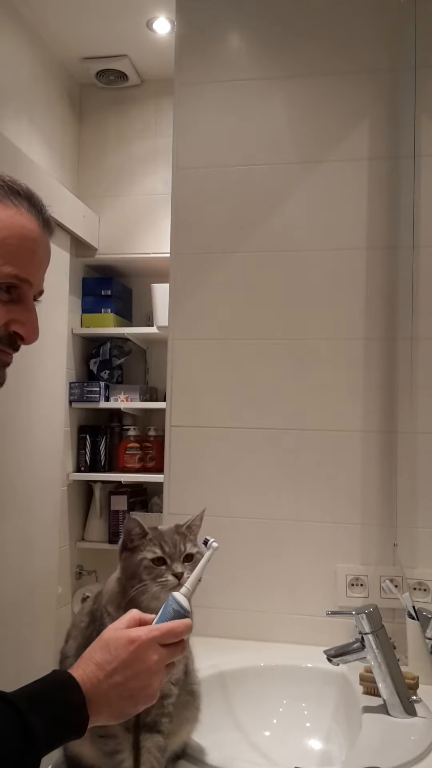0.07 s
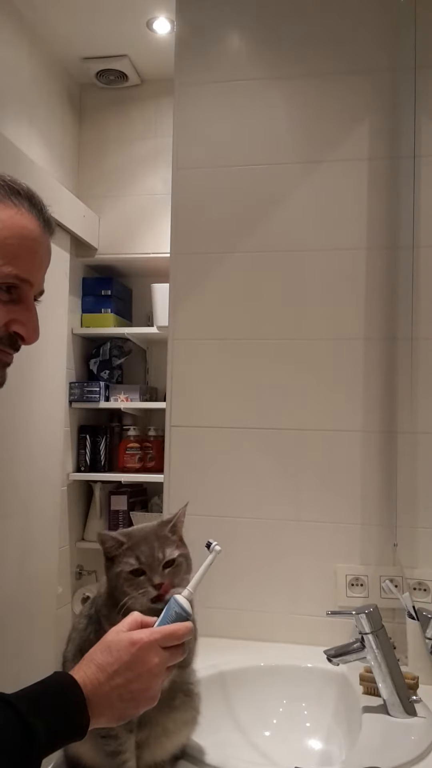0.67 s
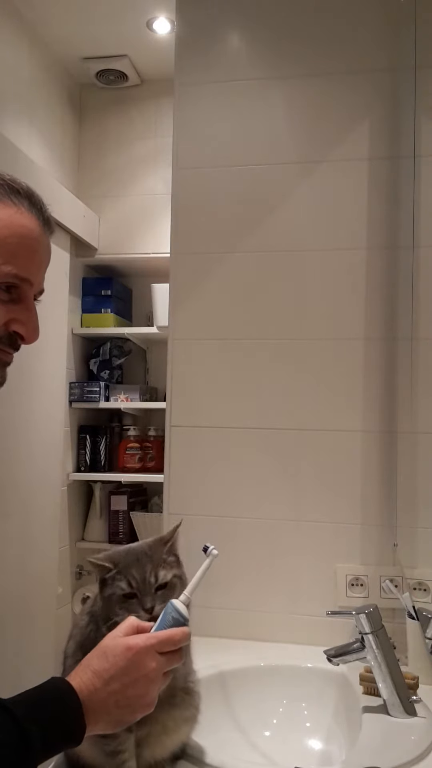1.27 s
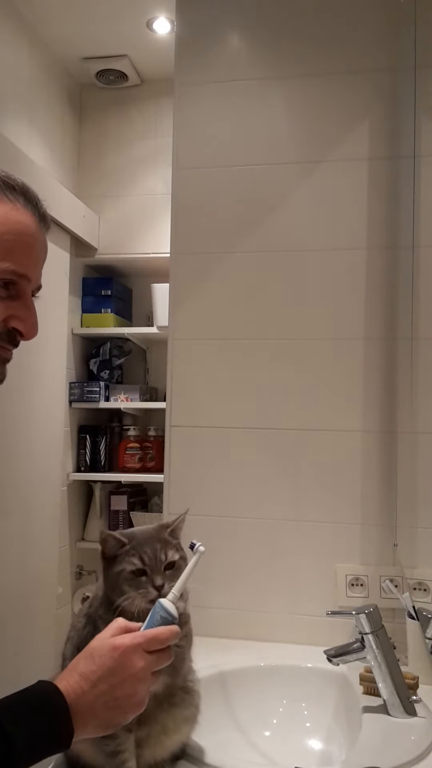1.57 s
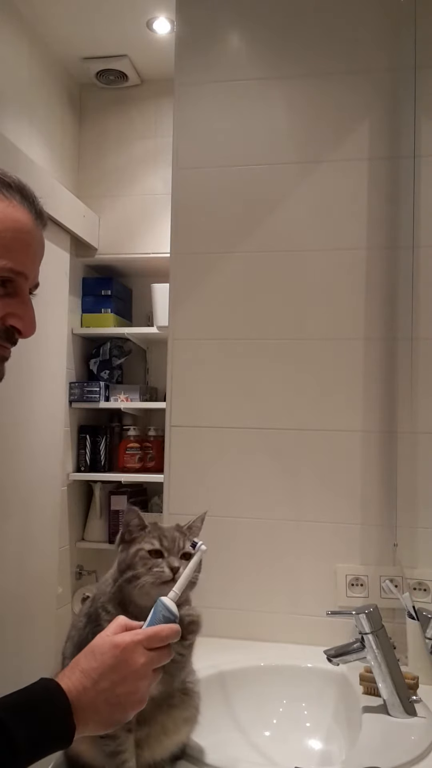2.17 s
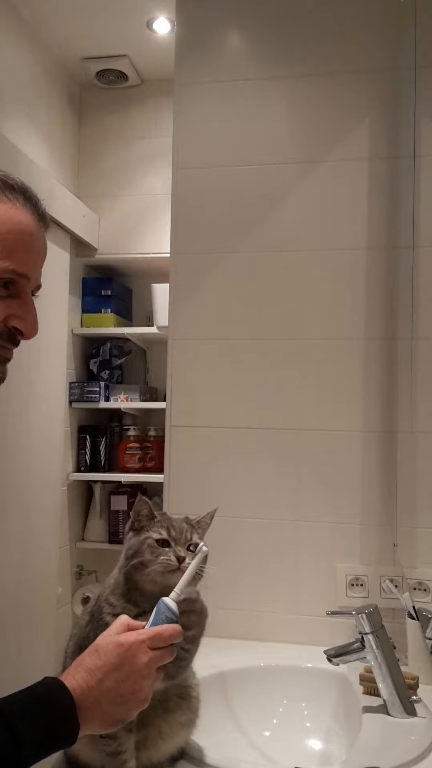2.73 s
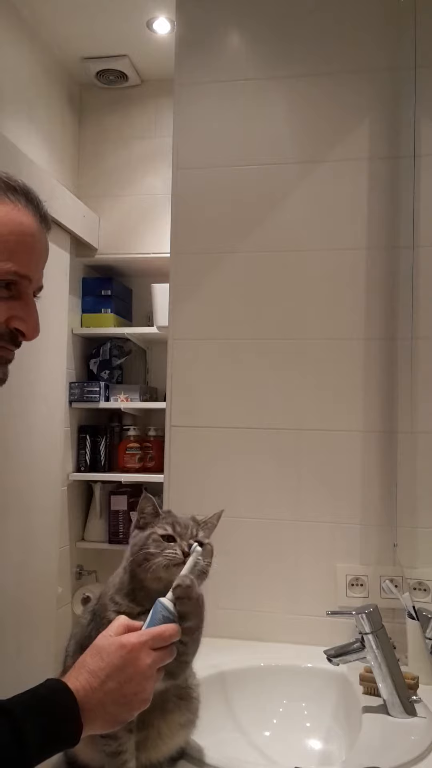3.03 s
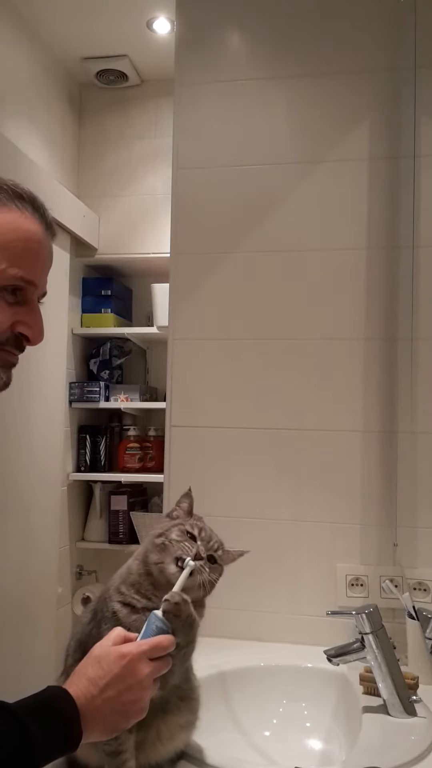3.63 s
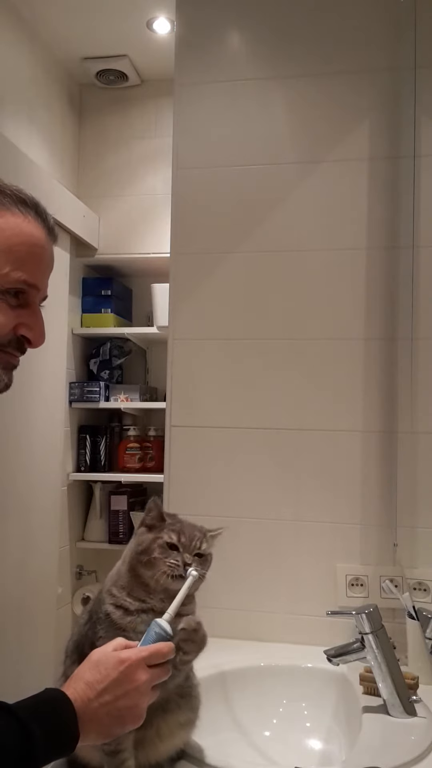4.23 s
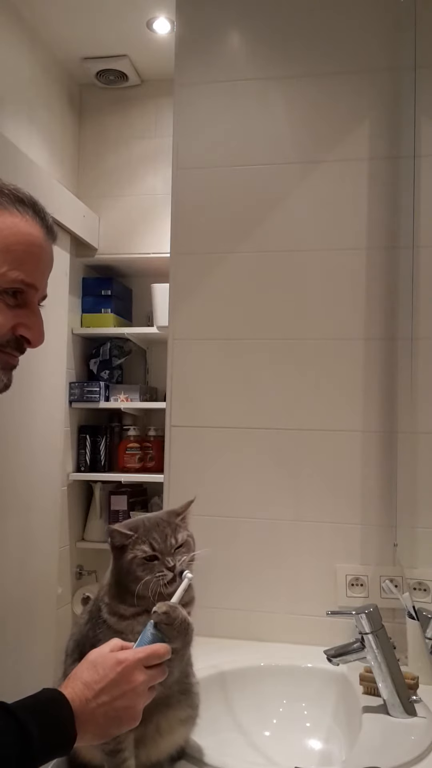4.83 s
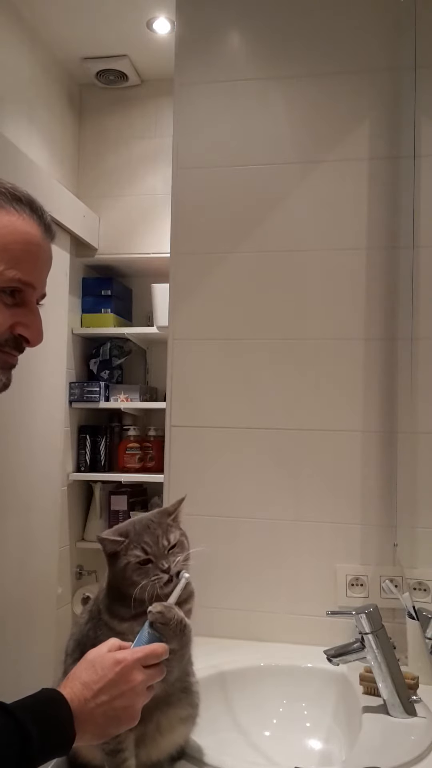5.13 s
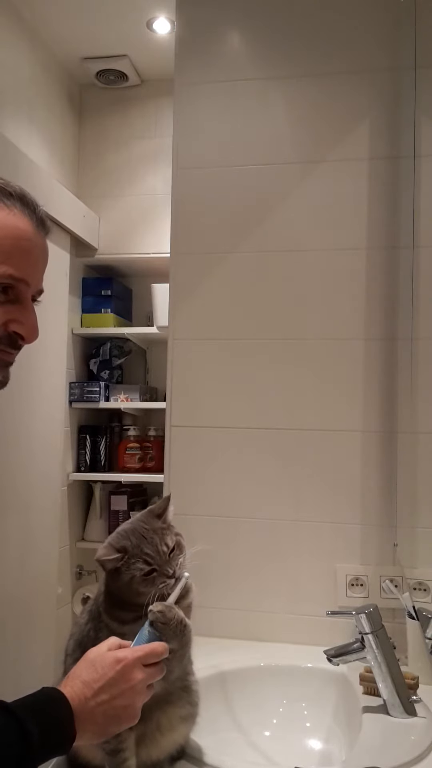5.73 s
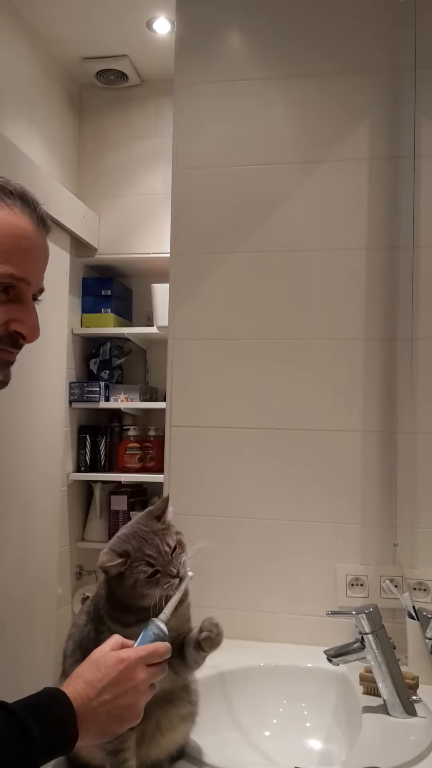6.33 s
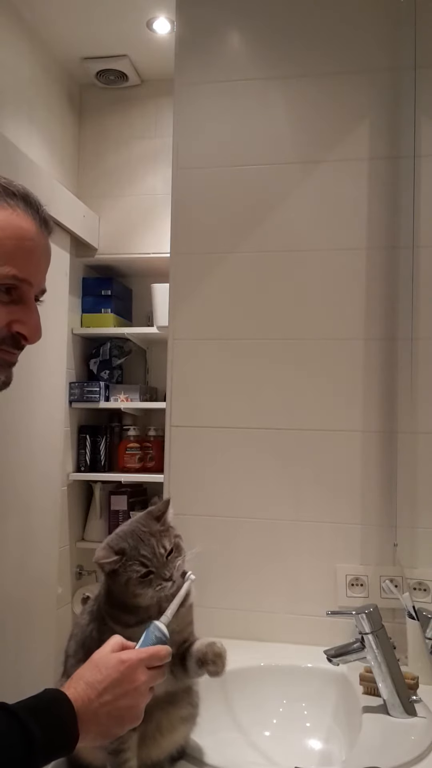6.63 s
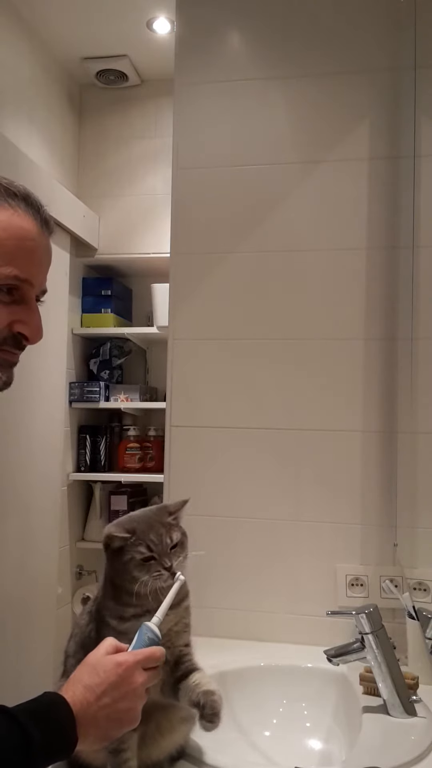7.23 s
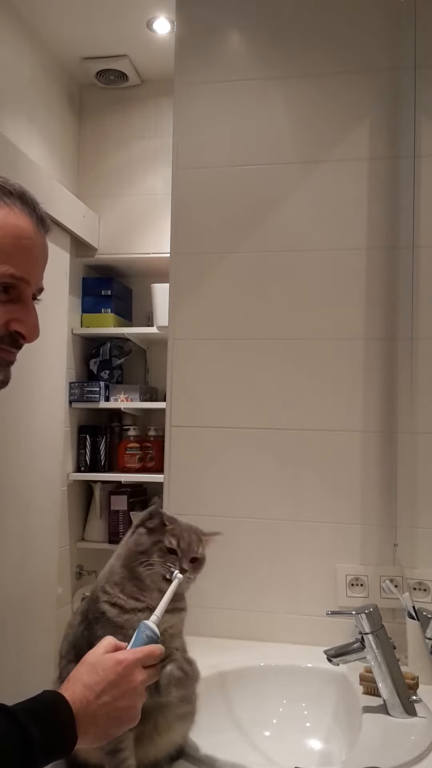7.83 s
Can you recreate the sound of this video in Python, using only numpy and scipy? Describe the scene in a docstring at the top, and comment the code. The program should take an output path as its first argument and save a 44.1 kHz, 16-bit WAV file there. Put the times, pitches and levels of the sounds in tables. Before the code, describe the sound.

After a faint ventilation hum, an electric toothbrush starts buzzing, rasps lightly on a cat's whiskers, and stutters four times before running on.

```python
"""An electric toothbrush runs in a small tiled bathroom while a cat rubs its face on the bristles.
One shaft drives the motor's whine, the gear's buzz, the handle's rattle and the head's sizzle; near the
end the power cuts out four times. A thumb rubs the switch first; the bristles snap on whiskers and hiss
through fur, and the head's scrapes ring the housing. Behind, a ventilator drones over a soft rumble,
held down by a noise suppressor until the brush starts."""
import sys
import numpy as np
from scipy import signal
from scipy.fft import rfft, irfft, next_fast_len
from scipy.io import wavfile
from scipy.ndimage import uniform_filter1d

SR = 44100
rng = np.random.default_rng(int(sys.argv[2]) if len(sys.argv) > 2 else 0)


def put_to_file(sound):
    """Save the sound as 16-bit audio at rate SR, in the file named by the first command-line argument."""
    columns = np.atleast_2d(sound).T  # one column per channel
    safe = np.clip(columns, -1, 1)
    whole_steps = np.round(safe * 32767)
    wavfile.write(sys.argv[1], SR, whole_steps.astype(np.int16))


N = 357210
TIME = np.arange(N) / SR


def from_db(db):
    """Decibels to gain."""
    return 10 ** (np.asarray(db) / 20)


def unit_mid(x):
    """Scale a stereo pair to a mid rms of 1."""
    return x / np.sqrt(np.mean(x.mean(0) ** 2) + 1e-20)


def in_time(rows):
    """A table's value columns, interpolated at every sample."""
    times_s, *columns = np.transpose(rows)
    return [np.interp(TIME, times_s, column) for column in columns]


def at_hz(rows, hz):
    """Read a table on a log-frequency axis."""
    points_hz, values = np.transpose(rows)
    return np.interp(np.log(hz + 1e-3), np.log(points_hz), values)


def filtered(x, gain_at):
    """Zero-phase filter; gain_at maps Hz to gain."""
    size = next_fast_len(N + 4096)
    hz = np.arange(size // 2 + 1) * SR / size
    return irfft(rfft(x, size) * gain_at(hz), size)[..., :N]


def drift(rate_hz, hop=64):
    """Slow noise with a standard deviation of 1."""
    white = rng.standard_normal(next_fast_len(N // hop + 1024))
    hz = np.arange(len(white) // 2 + 1) * SR / hop / len(white)
    slow = irfft(rfft(white) / (1 + (hz / rate_hz) ** 4))
    return np.interp(np.arange(N) / hop, np.arange(len(slow)), slow / slow.std())


def swell(centre_s, half_s):
    """Gaussian envelope, 1/e at half_s from its centre."""
    return np.exp(-((TIME - centre_s) / half_s) ** 2)


def lagged(x, tau_s):
    """One-pole smoothing."""
    pole = np.exp(-1 / (tau_s * SR))
    return signal.lfilter([1 - pole], [1, -pole], x)


def bathroom(x, wet_db, early_db=-3, echoes=12, t60_s=0.3):
    """Direct sound, right side first, echoes off basin and walls, and a diffuse tail from the tiles."""
    direct = np.array([np.roll(x, 4), x])
    lags = (rng.uniform(.001, .022, (2, echoes)) * SR).astype(int)
    early = np.array([sum(np.roll(x, lag) for lag in side) for side in lags]) / np.sqrt(echoes)
    pole = from_db(-120 / (t60_s * SR))
    energy = signal.lfilter([1 - pole], [1, -pole], x ** 2 + 1e-18)
    tail = np.sqrt(energy) * rng.standard_normal((2, N))
    return unit_mid(direct + from_db(early_db) * early + from_db(wet_db) * tail)


# Diffuse field. Each row: frequency in Hz, left-right correlation.
COHERENCE = [(60, 0.76), (200, 0.92), (400, 0.71), (800, 0.3), (2000, 0.033), (10000, 0.065)]

def diffuse(gain_at):
    """Stereo noise, alike on both sides in the bass, unrelated in the treble."""
    def gains(hz):
        alike = at_hz(COHERENCE, hz)
        return gain_at(hz) * np.sqrt([1 + alike, 1 - alike])
    mid, side = filtered(rng.standard_normal((2, N)), gains)
    return unit_mid(np.array([mid + side, mid - side]))


def resonant(centre_hz, half_width_hz):
    """Noise ringing in one resonance."""
    return diffuse(lambda hz: 1 / (1 + ((hz - centre_hz) / half_width_hz) ** 2))


# Hiss spectrum. Each row: frequency in Hz, relative density in dB.
HISS_SPECTRUM = [(4000, -1.5), (10500, -1), (12000, 0), (15800, -5.5)]

def hiss(base_db=-88.5, trim_db=1):
    """The microphone's self-noise."""
    return from_db(base_db + trim_db) * diffuse(lambda hz: from_db(at_hz(HISS_SPECTRUM, hz)))


# Rumble envelope. Each row: time in seconds, level in dB.
RUMBLE_LEVEL = [(0, -83.5), (2.0, -81.5), (2.35, -69), (2.75, -67), (3.2, -72), (4.5, -86), (6.1, -74),
                (7.0, -91), (8.1, -88)]

def rumble(centre_hz=44, half_width_hz=11):
    """A deep, soft rumble, strongest around the switch-on."""
    return from_db(in_time(RUMBLE_LEVEL)[0]) * resonant(centre_hz, half_width_hz)


# Rushing air. Each row: frequency in Hz, relative density in dB.
AIR_SPECTRUM = [(20, -30), (38, -19), (60, -10), (80, -9), (125, 0), (270, -2.5), (330, -7), (450, -13.5),
                (650, -14), (850, -20), (1050, -28), (2000, -34), (3200, -40.5), (5000, -58.5)]
# Duct resonances. Each row: centre in Hz, half width in Hz, relative level in dB.
DUCT_MODES = [(36.5, 2, -85.5), (57.6, 2.7, -79.5), (104, 6, -78.5), (184.4, 3.8, -68), (214, 8.2, -67),
              (238.5, 8.5, -69), (380.2, 7, -76.5), (431.7, 3, -81.5), (550, 18, -77)]
# Fan hum and whistle. Each row: frequency in Hz, level in dB.
FAN_TONES = [(100, -65), (858.5, -79)]
# Slow swell of air and duct. Each row: time in seconds, gain in dB.
DRONE_GAIN = [(0, 0.3), (2.1, 0), (2.9, 2), (4.4, 1.5), (6.4, -0.4), (8.1, 0.5)]

def ventilator(air_base_db=-61, air_trim_db=3, duct_trim_db=6, waver=0.064):
    """Air rushes through a resonant duct; the fan's motor adds slightly wavering tones."""
    air = from_db(air_base_db + air_trim_db) * diffuse(lambda hz: from_db(at_hz(AIR_SPECTRUM, hz)))
    duct = sum(from_db(db + duct_trim_db) * resonant(hz, half_hz) for hz, half_hz, db in DUCT_MODES)
    hum = 0
    for hz, db in FAN_TONES:
        phase = 2 * np.pi * hz * TIME + waver * np.sqrt(hz) / 4 * drift(4)
        hum += from_db(db) * np.sqrt(2) * np.sin(phase)
    return (air + duct) * from_db(in_time(DRONE_GAIN)[0]) + hum


# Stereo balance of the brush. Each row: frequency in Hz, left minus right in dB.
BRUSH_BALANCE = [(500, 0), (1300, 2), (3000, 2.5), (5500, -2), (7500, 4.5), (9000, -1.5), (10500, -16.5),
                 (13000, -6), (15500, -14)]

def radiated(x, spectrum, modes=()):
    """Colour x as one part of the brush, panned by frequency."""
    def gains(hz):
        lift_db = sum(db / (1 + (2 * (hz - centre_hz) / width_hz) ** 4)
                      for centre_hz, width_hz, db in modes)
        sides = from_db(at_hz(BRUSH_BALANCE, hz) * np.array([[.5], [-.5]]))
        return from_db(at_hz(spectrum, hz) + lift_db) * sides / np.hypot(*sides)
    return unit_mid(filtered(x, gains))


# Bright snap of friction. Each row: frequency in Hz, relative density in dB.
SNAP_SPECTRUM = [(7000, -16.5), (9000, -8), (10600, 6.5), (12000, -9), (13000, -16), (15000, -34)]

def rasps(events, rise_s, decay_s, gain_db, handle_db):
    """Short friction bursts sounding through head and handle."""
    envelope = np.zeros(N)
    for time_s, db in events:
        age_s = np.maximum(TIME - time_s + rise_s, 0)
        envelope += from_db(db + gain_db) * (1 - np.exp(-age_s / rise_s)) * np.exp(-age_s / decay_s)
    friction = bathroom(rng.standard_normal(N), wet_db=10)
    handle = from_db(handle_db) * radiated(friction, HANDLE_SPECTRUM, HOUSING_MODES)
    return envelope * (radiated(friction, SNAP_SPECTRUM) + handle)


# Thumb shifts. Each row: time in seconds, relative level in dB.
THUMB_RUBS = [(2.301, -72), (2.519, -67.5)]

def thumb(body_db=-84, body_s=.02, press_from_s=2.53, press_to_s=2.66, press_db=-90):
    """A thumb rubs the switch, each rub with a dull body, then presses with a faint creak."""
    rubs = rasps(THUMB_RUBS, rise_s=.007, decay_s=0.018, gain_db=-4.5, handle_db=-15)
    loudest_db = max(db for _, db in THUMB_RUBS)
    envelope = sum(from_db(body_db + db - loudest_db) * swell(time_s + body_s / 2, body_s)
                   for time_s, db in THUMB_RUBS)
    body = envelope * resonant(centre_hz=2900, half_width_hz=1100)
    pressing = uniform_filter1d(1. * ((TIME > press_from_s) & (TIME < press_to_s)), size=1024)
    creak = from_db(press_db) * pressing * radiated(rng.standard_normal((2, N)), SNAP_SPECTRUM)
    return rubs + body + creak


# Head scrapes. Each row: centre in seconds, half length in seconds, ring in Hz, half width in Hz,
# level in dB.
HEAD_SCRAPES = [(2.696, 0.016, 3050, 400, -69), (2.785, 0.038, 2940, 400, -63),
                (3.443, 0.017, 3180, 700, -52), (3.844, 0.019, 3000, 600, -53),
                (4.033, 0.12, 3080, 300, -53.5), (4.386, 0.032, 3060, 350, -52),
                (4.588, 0.037, 3120, 600, -52), (5.078, 0.11, 3000, 300, -59),
                (6.288, 0.03, 3070, 300, -55.5), (6.702, 0.039, 3150, 420, -52),
                (7.102, 0.15, 3020, 300, -60), (7.744, 0.17, 3020, 300, -57.5)]

def scrapes():
    """The head scrapes and rings one housing resonance."""
    return sum(from_db(db) * swell(centre_s, half_s) * resonant(hz, half_hz)
               for centre_s, half_s, hz, half_hz, db in HEAD_SCRAPES)


# Strokes through fur. Each row: centre in seconds, half length in seconds, level in dB.
FUR_SWEEPS = [(2.725, 0.02, -65), (3.333, 0.11, -63), (3.678, 0.15, -56), (4.437, .065, -57.5),
              (4.59, .12, -62.5), (5.74, .03, -63), (5.892, 0.049, -63), (6.287, .03, -63),
              (7.18, 0.048, -66.5), (8.1, 0.068, -54)]
# Fur hiss. Each row: frequency in Hz, relative density in dB.
FUR_SPECTRUM = [(9000, -33), (12500, 0), (14000, -1), (15800, -4)]

def sweeps():
    """Bristles sweep through fur in swells of fine, bright hiss."""
    envelope = sum(from_db(db) * swell(centre_s, half_s) for centre_s, half_s, db in FUR_SWEEPS)
    return envelope * radiated(bathroom(rng.standard_normal(N), wet_db=8), FUR_SPECTRUM)


# Bristle catches. Each row: time in seconds, relative level in dB.
BRISTLE_FLICKS = [(4.014, -40), (4.06, -45), (4.122, -43), (4.2403, -38), (4.2495, -47), (4.4195, -37),
                  (4.429, -46), (4.73, -41), (4.83, -44), (4.93, -48), (5.0574, -38), (7.2931, -47.5),
                  (7.7388, -45.5)]

def flicks():
    """Bristles catch on whiskers and teeth, snap free with a tick and scratch on softly."""
    ticks = rasps(BRISTLE_FLICKS, rise_s=0.00041, decay_s=0.0018, gain_db=4.5, handle_db=-26)
    scratches = rasps(BRISTLE_FLICKS, rise_s=0.0079, decay_s=0.022, gain_db=-3, handle_db=-17)
    return ticks + scratches


def shaft_tones(turns, orders, levels_db, echo_db, size=32768):
    """Harmonics locked to a shaft; two reflections swell and fade as the hand moves."""
    def path():
        phase = rng.uniform(0, 2 * np.pi, len(orders))
        phase = phase + np.array([[.5], [-.5]]) * rng.uniform(-np.pi / 2, np.pi / 2, len(orders))
        bins = np.round(orders).astype(int)
        lines = np.zeros((2, size // 2 + 1), complex)
        lines[:, bins] = from_db(levels_db) * np.exp(1j * phase) * size / np.sqrt(2)
        return irfft(lines)[:, (turns % 1 * size).astype(int)]
    return path() + from_db(echo_db) * (drift(0.98) * path() + drift(3.67) * path())


def contacts(turns, per_turn, spread_db, angle_spread_db, angles=48):
    """Loose parts knock at random, hardest at the same few angles of each gear turn."""
    angle_gain = from_db(angle_spread_db * rng.standard_normal(angles))
    hits = rng.random(N) < per_turn * np.gradient(turns)
    sizes = from_db(spread_db * np.clip(rng.standard_normal(N), -2, 2)) * rng.choice([-1, 1], N)
    return hits * sizes * angle_gain[(turns % 1 * angles).astype(int)]


def periodic_rattle(turns, spread_db, order_limit):
    """Contacts that repeat every turn: an uneven comb of harmonics."""
    levels_db = spread_db * np.clip(rng.standard_normal(order_limit - 1), -2, 2)
    return unit_mid(shaft_tones(turns, np.arange(1, order_limit), levels_db, echo_db=2.5))


def grip(x, depth_db=0.7, rate_hz=4.6, bands=9):
    """The changing grip makes overlapping bands of the handle waver independently."""
    centres_hz = np.geomspace(700, 8000, bands)
    parts = (filtered(x, lambda hz: np.interp(hz, centres_hz, band)) for band in np.eye(bands))
    return unit_mid(sum(part * from_db(depth_db * drift(rate_hz)) for part in parts))


# Brush head. Each row: frequency in Hz, relative density in dB.
HEAD_SPECTRUM = [(4820, -68), (8200, -17), (10500, 3), (13200, -13), (15200, -22), (15800, -12)]

def head_sizzle(turns, settled):
    """Dense ticks in the head, joined by a periodic part once up to speed."""
    ticks = bathroom(contacts(turns, per_turn=50, spread_db=5, angle_spread_db=7.5), wet_db=12)
    periodic = from_db(-2) * settled * periodic_rattle(turns, spread_db=5, order_limit=235)
    return radiated(ticks + periodic, HEAD_SPECTRUM)


# Handle. Each row: frequency in Hz, relative density in dB.
HANDLE_SPECTRUM = [(100, -17), (300, -4), (450, -6.5), (700, -7), (900, -6), (1100, -8.5), (1400, -9),
                   (1700, -6.5), (2500, -6), (3700, -5), (4600, -8.5), (6200, -9.5), (8000, -11),
                   (11000, -10.5), (15000, -14.5)]
# Plastic housing resonances. Each row: centre in Hz, width in Hz, lift in dB.
HOUSING_MODES = [(1546, 134, 6), (1850, 540, 0), (2956, 440, 4.5), (4340, 180, 2.5), (5440, 510, 4.5),
                 (7090, 610, 4.5)]

def handle_rattle(turns, cycles, settled, low_db, locked_share=0.31):
    """The gear knocks in the housing, partly periodic at speed; returns bands below and above 4 kHz."""
    knocks = bathroom(contacts(turns, per_turn=80, spread_db=4.5, angle_spread_db=7), wet_db=0.5)
    meshing = periodic_rattle(cycles, spread_db=3.5, order_limit=900)
    locked = locked_share * settled
    drive = np.sqrt(1 - locked) * knocks + np.sqrt(locked) * meshing
    handle = grip(radiated(drive, HANDLE_SPECTRUM, HOUSING_MODES))
    treble = filtered(handle, lambda hz: 1 - 1 / (1 + (hz / 4000) ** 6))
    low = filtered(handle, lambda hz: 1 / (1 + (hz / 2400) ** 8))
    return handle - treble + (from_db(low_db) - 1) * low, treble


# Outline of the gear's comb. Each row: multiple of the gear rate, relative level in dB.
GEAR_COMB = [(2, -75), (8, -83), (9, -73), (10, -78), (15, -80), (16, -86), (17, -79), (20, -74.5),
             (21, -89), (24, -71.5), (25, -66.5), (27, -73.5), (29, -77), (31, -78), (34, -75), (41, -81),
             (44, -72.5), (45, -81), (49, -83), (50, -66.5), (51, -92), (54, -73), (55, -71), (56, -96),
             (73, -81), (78, -68.5), (79, -91), (81, -73), (84, -90), (97, -97), (100, -75), (103, -75),
             (112, -93)]
# Tooth-mesh tones. Each row: multiple of the mesh cycle rate, relative level in dB.
MESH_TONES = [(113, -81), (132, -79), (137, -71), (151, -73), (238, -70.5)]

def gear_buzz(turns, cycles):
    """A comb of gear harmonics, with tones of the meshing teeth between its lines."""
    orders = np.arange(2, 113)
    comb = shaft_tones(turns, orders, np.interp(orders, *np.transpose(GEAR_COMB)), echo_db=-9.5)
    return comb + shaft_tones(cycles, *np.transpose(MESH_TONES), echo_db=-9)


# Whine harmonics. Each row: multiple of the motor rate, relative level in dB.
WHINE_TONES = [(3, -3), (5, -5.5), (6, 0.5), (9, -3.5), (12, -24), (17, -6.5)]
# Whine, strongest as the cat leans in. Each row: time in seconds, gain at full speed in dB.
WHINE_GAIN = [(2.85, -73), (3.1, -68), (3.5, -68.5), (4.0, -63), (4.7, -63.5), (5.4, -65.5), (5.85, -64),
              (6.05, -75), (6.35, -72), (7.15, -66), (7.7, -64), (8.1, -69)]
# Thin whine. Each row: time in seconds, level at full speed in dB.
THIN_LEVEL = [(2.8, -75), (3.0, -69), (3.45, -72), (3.7, -84), (4.3, -77), (4.6, -79), (5.05, -63),
              (5.5, -82), (6.0, -86)]

def motor_whine(motor_turns, steady, settled, thin_order=7):
    """Motor harmonics that need steady running, and one thin tone that comes in sooner."""
    whine = shaft_tones(motor_turns, *np.transpose(WHINE_TONES), echo_db=-18)
    whine *= steady * from_db(in_time(WHINE_GAIN)[0])
    thin = shaft_tones(motor_turns, [thin_order], levels_db=0, echo_db=-18)
    return whine + settled * from_db(in_time(THIN_LEVEL)[0]) * thin


# Motor current. Each row: on in seconds, off in seconds.
POWER_SPANS = [(2.638, 5.985), (6.085, 6.385), (6.512, 6.835), (6.955, 7.254), (7.378, np.inf)]

def motor_speed(spin_up_s=.044, coast_s=.22):
    """Fraction of running speed: the motor spins up fast when fed and coasts when cut."""
    speed = np.zeros(N)
    for on_s, off_s in POWER_SPANS:
        fed, cut = TIME >= on_s, TIME >= off_s
        initial = speed[np.argmax(fed)]
        speed[fed] = 1 - (1 - initial) * np.exp(-(TIME[fed] - on_s) / spin_up_s)
        speed[cut] *= np.exp(-(TIME[cut] - off_s) / coast_s)
    return speed


def steadiness(speed, slack=0.078, build_s=0.1):
    """Strength of the whine, 0 to 1: builds near full speed, collapses as the motor slows."""
    near_full = np.exp(-(1 - speed) / slack)
    return near_full * lagged(near_full, build_s)


# Running speed, sagging as the cat leans in. Each row: time in seconds, gear turns per second.
GEAR_RATE = [(2.9, 67.33), (3.05, 66.8), (3.4, 66.85), (3.58, 66.62), (3.7, 66.1), (3.9, 66.58),
             (4.2, 66.72), (4.62, 66.44), (5.02, 66.76), (5.62, 66.8), (5.83, 66.48), (8, 66.6)]
# Rattle as the brush is turned and pressed. Each row: time in seconds, then relative levels in dB of
# the handle, the handle above 4 kHz and the head.
RATTLE_LEVELS = [(2.66, -57.5, -66, -58.5), (2.87, -52, -52.5, -51.5), (3.3, -51.5, -52.5, -49.5),
                 (4.0, -50.5, -53.5, -49.5), (4.48, -49.5, -52.5, -46.5), (4.75, -51, -53, -51),
                 (5.1, -50.5, -53, -50), (5.4, -52.5, -55.5, -51.5), (5.9, -53, -55, -51),
                 (6.3, -51.5, -56, -50.5), (6.6, -53.5, -57.5, -53), (7.1, -52.5, -57, -52.5),
                 (7.7, -52, -57, -51), (8.1, -52.5, -56, -50)]
# Handle below 2.4 kHz and gear buzz, filling in late. Each row: time in seconds, gain in dB.
LOW_GAIN = [(2.66, -2), (2.95, -3), (3.3, -2), (3.7, -0.7), (4.5, -0.5), (5.3, 0), (5.85, 1), (6.1, 1.5),
            (6.35, 0.5), (8.1, -0.4)]

def toothbrush(wobble=.0012, gear_ratio=13 / 5, body_trim_db=-1.6, head_trim_db=-2, buzz_gain_db=49.5):
    """One shaft drives rattle, sizzle, buzz and whine; all sink as it slows."""
    speed = motor_speed()
    turns = np.cumsum(in_time(GEAR_RATE)[0] * speed * (1 + wobble * drift(14))) / SR
    cycles = turns / 5  # the same teeth meet again every five gear turns
    settled = speed ** 6  # contacts repeat only near full speed
    steady = steadiness(speed)
    handle_db, treble_db, head_db = in_time(RATTLE_LEVELS)
    low_db = in_time(LOW_GAIN)[0]
    body, treble = handle_rattle(turns, cycles, settled, low_db)
    body *= from_db(handle_db + body_trim_db) * speed ** 0.97
    treble *= from_db(treble_db) * speed ** 2
    sizzle = from_db(head_db + head_trim_db) * speed ** 1.85 * head_sizzle(turns, settled)
    buzz_gain = from_db(handle_db + low_db + buzz_gain_db) * settled * np.sqrt(steady)
    buzz = buzz_gain * gear_buzz(turns, cycles)
    return body + treble + sizzle + buzz + motor_whine(turns * gear_ratio, steady, settled)


def scene():
    """The brush and its contact sounds over ventilator, rumble and hiss."""
    return hiss() + toothbrush() + thumb() + flicks() + sweeps() + scrapes() + ventilator() + rumble()


def record(dry, threshold_db=-64, depth_db=-6.5, open_s=0.24, edge_hz=9800, dc=-0.00041, top_hz=15780):
    """A suppressor ducks all below edge_hz until treble opens it; then DC offset and a steep low-pass."""
    treble = signal.sosfilt(signal.butter(2, 3000, "high", fs=SR, output="sos"), dry.mean(0))
    active = uniform_filter1d(treble ** 2, size=1024) > from_db(threshold_db) ** 2
    opened = lagged(active * 1., open_s)
    ducked_band = filtered(dry, lambda hz: np.clip((edge_hz - hz) / 600 + .5, 0, 1))
    suppressed = dry - ducked_band * (1 - from_db(depth_db * (1 - opened)))
    return filtered(suppressed + dc, lambda hz: np.clip((top_hz - hz) / 100 + .5, 0, 1))


dry = scene()
out = record(dry)
put_to_file(out)
```